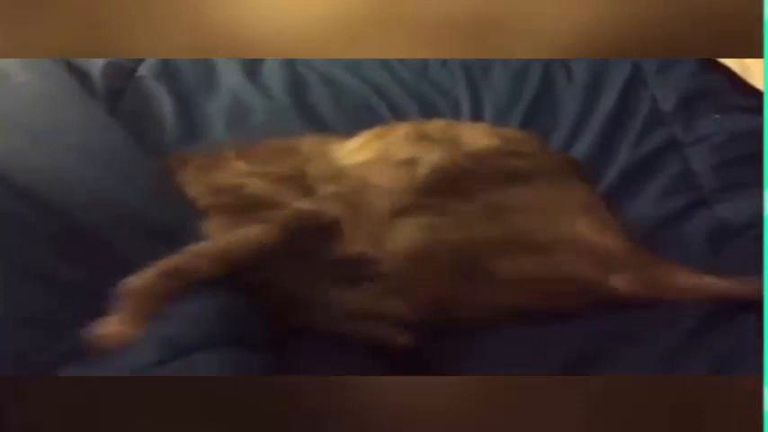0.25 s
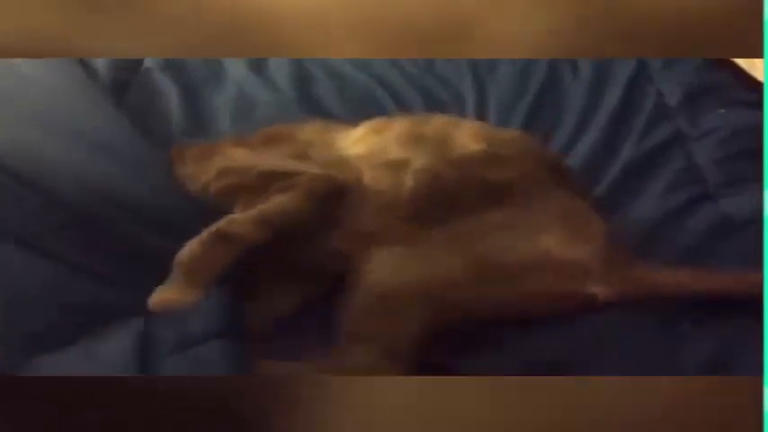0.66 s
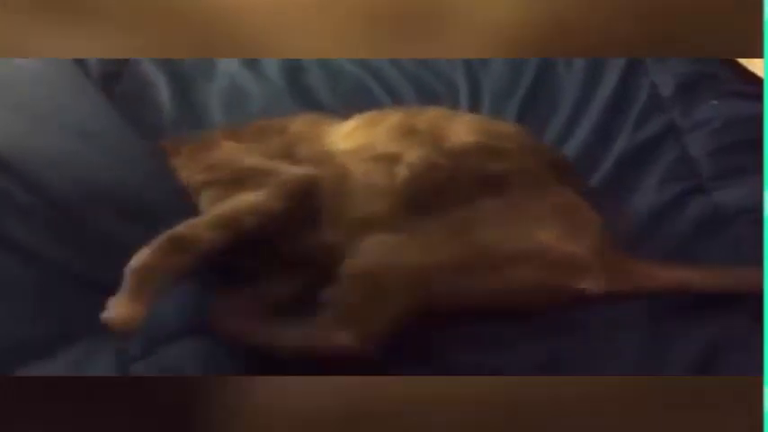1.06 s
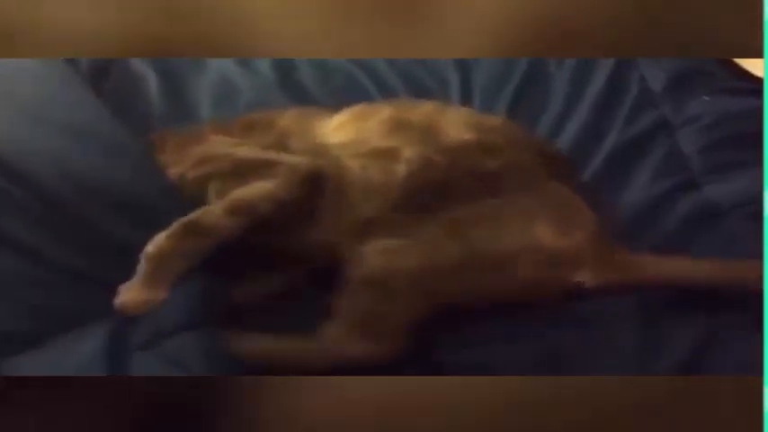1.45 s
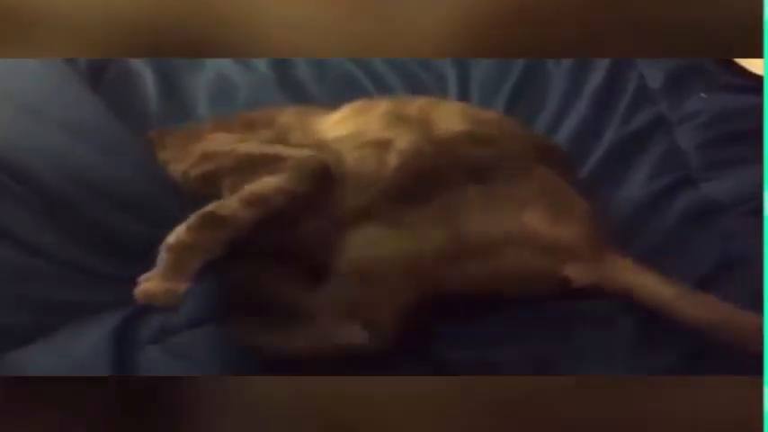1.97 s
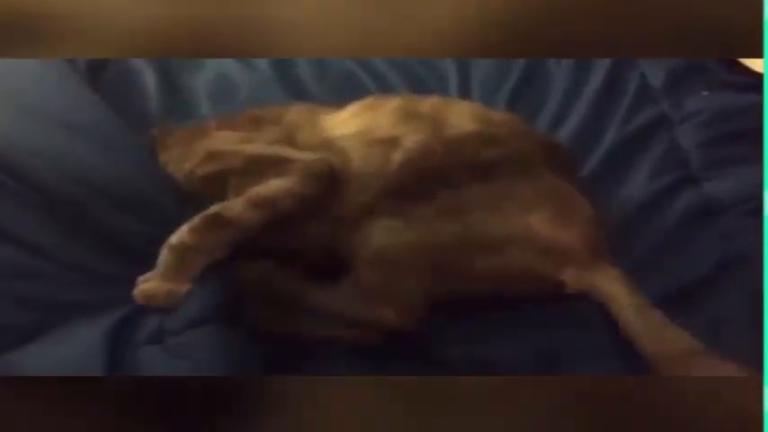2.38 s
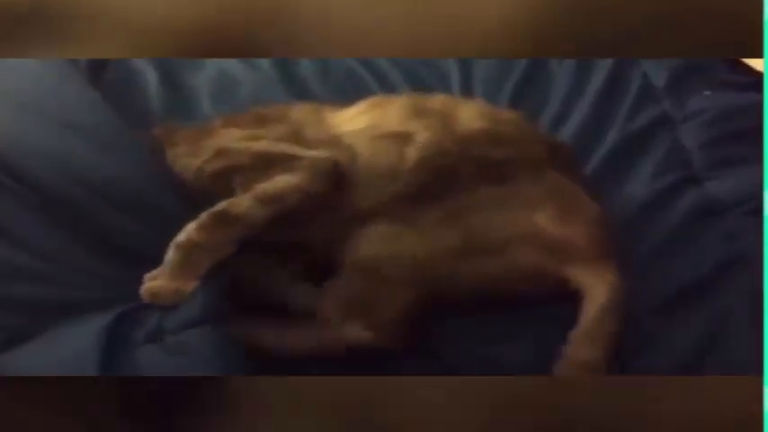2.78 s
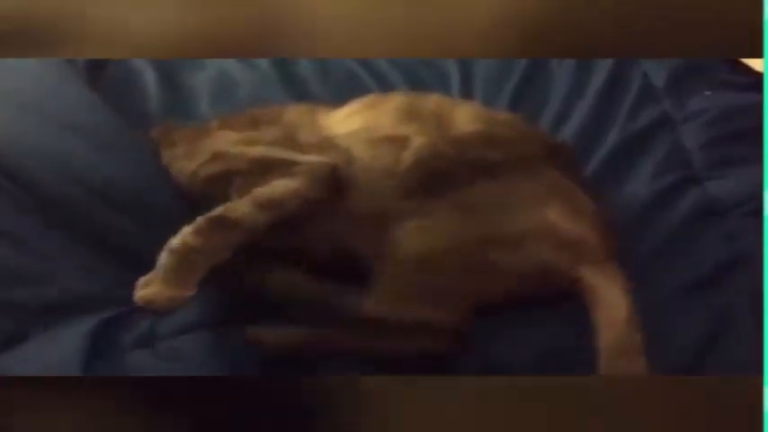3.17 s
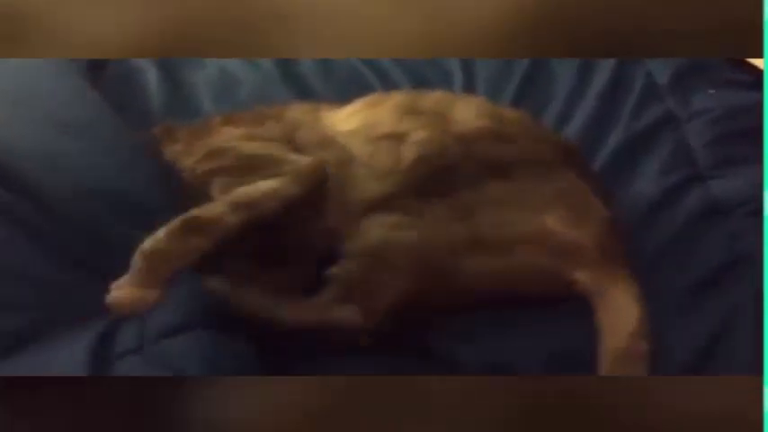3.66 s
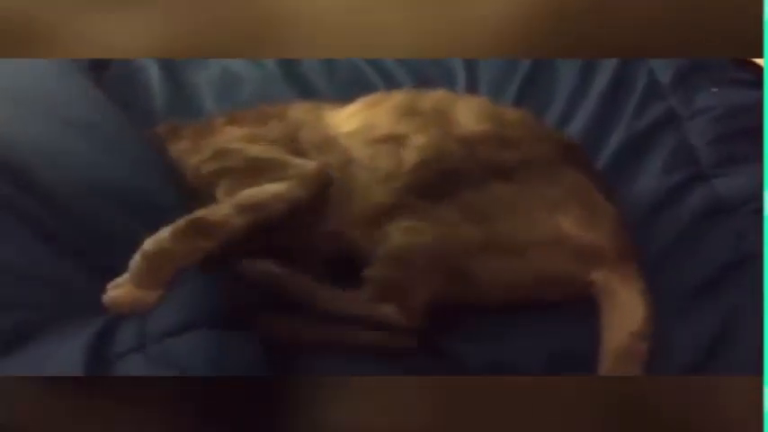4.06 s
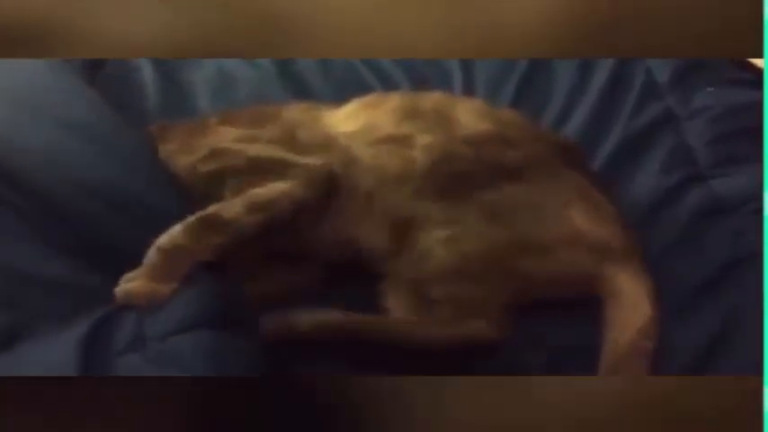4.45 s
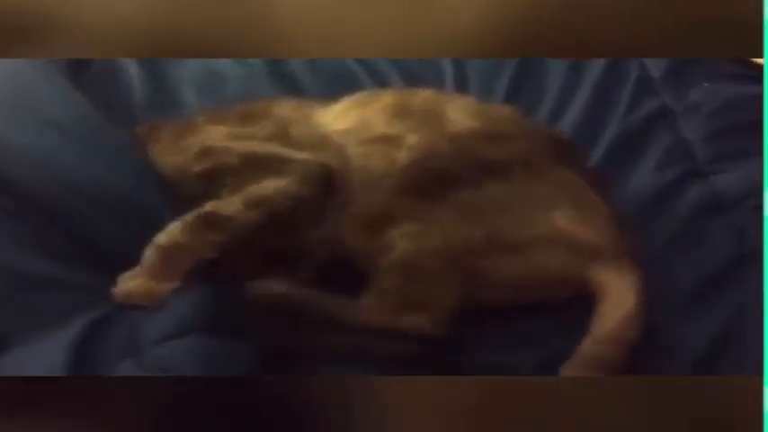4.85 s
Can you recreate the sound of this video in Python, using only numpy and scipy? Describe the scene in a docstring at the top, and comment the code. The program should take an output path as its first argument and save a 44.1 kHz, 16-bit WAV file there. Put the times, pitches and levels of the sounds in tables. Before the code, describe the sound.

Irregular scratching on cloth, dull rubs mixed with claw rasps and sharp little snags, crowding mid-way, then thinning over faint rustle.

```python
"""A cat on a bedspread kicks with a hind leg for five seconds in a quiet room; both channels are alike.
From the start, strokes rub dully, rasp and hiss: each is a run of tiny slips of the paw on the cloth.
Narrow-band scrapes slide over the weave, snagged threads tick, and the leg lands with soft thumps.
The strokes crowd together from about two seconds on, thin out and soften after three and a half,
then return briefly near the end. Rustling bedding and still air are there throughout."""
import sys
import numpy as np
from scipy import signal
from scipy.fft import rfft, irfft
from scipy.io import wavfile
from scipy.ndimage import uniform_filter1d

SR = 44100
rng = np.random.default_rng(int(sys.argv[2]) if len(sys.argv) > 2 else 0)


def wrap_up_sound(samples):
    """Save the sound to the file named by the first command line argument, as 16-bit audio."""
    columns = np.atleast_2d(samples).T
    # keep every value between -1 and 1, then stretch to whole-number steps
    tamed = np.clip(columns, -1, 1)
    steps = np.round(tamed * 32767).astype(np.int16)
    wavfile.write(sys.argv[1], SR, steps)


N = 225703  # length of the sound, in samples

# How the rubbing cloth spreads its sound over pitch: (frequency [Hz], relative level [dB])
CLOTH_COLOUR = [(30, -10), (70, -2.5), (130, 3), (260, 1), (420, 3), (560, 4), (680, 4), (760, -10),
                (860, -3), (1000, -0.5), (1300, -0.5), (1420, -8.5), (1700, -11), (2300, -17)]
# The same for rasping claws: (frequency [Hz], relative level [dB])
CLAW_COLOUR = [(1100, -49), (1650, -26), (1880, -3.5), (2300, 3.5), (2550, 2.5), (2850, 3), (3100, 1.5),
               (3320, 7.5), (3520, -5), (3720, 4), (3950, -10), (4300, -9.5), (5200, -53)]
# The same for hissing fur and fibres: (frequency [Hz], relative level [dB])
FIBRE_COLOUR = [(3300, -17), (4200, 5), (4700, 1.5), (5300, 5), (6300, 3), (7200, -2), (8800, -1.5),
                (10000, -8.5), (11000, -25.5), (14000, -50.5)]


def scratching(lumps_db=2.0):
    """The paw's grip wavers in all three kinds of friction; folds passing under it make the rub lumpy."""
    cloth, claw, fibre = stroke_levels()
    grip = drift(260)
    folds = from_db(lumps_db * drift(110))
    rub = friction(cloth * folds, 8.1 * grip, per_s=2200, spread_db=0.5, bite_db=-56.0)
    rasp = friction(claw, 3.0 * grip, per_s=3100, spread_db=0.0, bite_db=-54.5)
    hiss = friction(fibre, 4.9 * grip, per_s=8700, spread_db=-4.0, bite_db=-50.0)
    return colour(rub, CLOTH_COLOUR) + colour(rasp, CLAW_COLOUR) + colour(hiss, FIBRE_COLOUR)


def stroke_levels():
    """Cloth rubs as loudly as the push; claws and fibres grow faster, and louder with the claws out."""
    # Strokes of the paw: (touch-down [s], swell [s], fade [s], push [dB], claws out [dB])
    strokes = [(0.042, 0.085, 0.054, -49, -7.5), (0.063, 0.005, 0.082, -54.5, 4.5),
               (0.085, 0.013, 0.018, -54.5, 5), (0.234, 0.13, .07, -60.5, -1.5),
               (0.407, 0.049, 0.04, -52, -5), (0.527, 0.035, 0.034, -57.5, 0),
               (0.78, 0.057, 0.031, -49, -1), (0.899, 0.016, 0.04, -56.5, -7),
               (1.053, 0.032, 0.04, -62.5, 0.5), (1.106, 0.087, .05, -56.5, -2.5),
               (1.229, 0.0067, 0.048, -55, 0), (1.538, .077, .04, -52.5, -2.5),
               (1.854, 0.067, 0.019, -49.5, 1.5), (1.93, 0.052, 0.039, -51, -1.5),
               (2.081, 0.014, 0.028, -54, -3), (2.108, 0.073, 0.025, -51, 1), (2.188, 0.024, .027, -51, 3),
               (2.339, 0.016, 0.19, -55, -6.5), (2.404, 0.017, .034, -48.5, 3.5),
               (2.522, 0.042, 0.093, -55, -6.5), (2.661, 0.028, .04, -50.5, -12),
               (2.682, 0.015, 0.023, -50.5, 6), (2.728, 0.019, 0.038, -57.5, -1),
               (2.85, 0.024, 0.046, -51.5, -9), (2.917, 0.0097, 0.027, -47.5, -10),
               (2.932, 0.028, 0.029, -45.5, 1.5), (3.008, 0.034, 0.039, -56, 0),
               (3.112, .011, 0.02, -50.5, -11), (3.165, 0.015, 0.023, -55.5, -7),
               (3.229, 0.0014, 0.032, -55.5, 9.5), (3.244, 0.037, 0.032, -55, 4),
               (3.384, 0.12, 0.049, -58, -6), (3.598, .016, 0.011, -65.5, 2),
               (3.715, .088, 0.044, -58.5, -7), (3.884, 0.061, 0.055, -70, 3.5),
               (4.249, 0.073, 0.092, -64, 0.5), (4.419, 0.031, 0.022, -54, 1),
               (4.769, 0.027, 0.024, -55, -3), (4.799, .032, 0.049, -49, 3),
               (4.893, 0.011, 0.017, -51, -12)]
    usual_push_db = -50
    claw_db, claw_growth = -44, 1.557  # level at the usual push; dB per dB of push
    fibre_db, fibre_growth = -50.5, 1.343  # the same for the fibres, before the growth of claws out
    fibre_per_claw = 1.64  # dB per dB of claws out
    fibre_lag_s = 0.0028  # the fibres hiss loudest this much later, as the paw speeds up
    touch_s = 0.0026  # the sound rises from nothing this quickly as the paw meets the cloth
    t = np.arange(N) / SR
    power = np.zeros((3, N))
    for start_s, swell, fade, push_db, claws_db in strokes:
        near = (t > start_s) & (t < start_s + swell + 4 * fade)
        age = t[near] - start_s
        push = from_db(push_db - usual_push_db)
        press = pressing(age, swell, fade)
        late_press = pressing(age, swell + fibre_lag_s, fade)
        cloth = from_db(push_db) * press
        claw = from_db(claw_db + claws_db) * (push * press) ** claw_growth
        fibre = from_db(fibre_db + fibre_per_claw * claws_db) * (push * late_press) ** fibre_growth
        touch = np.minimum(age / touch_s, 1)
        power[:, near] += (touch * np.array([cloth, claw, fibre])) ** 2  # powers of strokes add
    return np.sqrt(power)


def pressing(age, swell, fade, shape=1.16, touch_db=-12.5, hold_s=0.0019):
    """The paw touches down below full push, leans in to it, holds it briefly and eases off."""
    leaning = from_db(touch_db * np.clip(1 - age / swell, 0, 1))
    easing_age = np.maximum(age - swell - hold_s, 0)
    return leaning * np.exp(-(easing_age / fade) ** shape)


def friction(level, grip_db, per_s, spread_db, bite_db):
    """A light touch brushes smoothly; pressed harder than bite_db, it mostly sticks and slips in grains."""
    bite = level / (level + from_db(bite_db))
    grains = evened(from_db(grip_db) * slips(per_s, spread_db))
    brushing = rng.standard_normal(N)
    return level * (np.sqrt(bite) * grains + np.sqrt(1 - bite) * brushing)


def slips(per_s, spread_db):
    """Tiny slips at random moments, each a click of random sign; rms 1."""
    sizes = from_db(spread_db * np.minimum(rng.exponential(1, N), 4))
    happens = rng.random(N) < per_s / SR
    signs = rng.choice([-1, 1], N)
    return rms_one(happens * sizes * signs)


def evened(x, span_s=0.012):
    """The paw's push bounds how much the slips can give within a few milliseconds."""
    nearby_power = np.abs(uniform_filter1d(x ** 2, max(int(span_s * SR), 1)))
    return x / np.sqrt(nearby_power + 1e-3)


def weave_scrapes(spread_db=-2.0):
    """Uneven thread crossings ring in a narrow band that glides up as the paw gathers speed."""
    # Narrow-band scrapes as the paw or claws slide over the ribs of the weave:
    # (time [s], half length [s], pitch [Hz], level [dB])
    scrape_table = [(0.099, .009, 3050, -48), (0.457, .012, 2830, -50), (0.848, .008, 6020, -51.5),
                    (1.617, 0.0092, 4000, -49.5), (1.915, .012, 2873, -39), (1.967, .007, 5390, -48.5),
                    (1.973, .007, 3040, -44.5), (2.103, .012, 1200, -54.5), (2.164, .022, 3040, -44.5),
                    (2.211, .010, 5330, -45.5), (2.215, 0.0062, 7720, -50), (2.43, .012, 3078, -38.5),
                    (2.693, .008, 3000, -38), (2.957, .008, 2883, -39), (3.051, 0.012, 2797, -51.5),
                    (3.254, 0.003, 5580, -42), (3.262, .004, 2860, -44), (3.281, .012, 5080, -44),
                    (3.547, .02, 648, -61.5), (4.832, .025, 2186, -48.5), (4.836, .026, 1186, -52.5)]
    width_hz, widest = 850, 0.19  # spread of the crossing rate; at most this share of the pitch
    glide = 0.0394  # rise per half length, as a share of the pitch
    t, out = np.arange(N) / SR, np.zeros(N)
    for middle_s, half, pitch_hz, level_db in scrape_table:
        near = np.abs(t - middle_s) < 3 * half
        place = (t[near] - middle_s) / half
        hz = pitch_hz * (1 + glide * np.clip(place, -1, 1))
        noise = rng.standard_normal(N) + 1j * rng.standard_normal(N)
        crossings = noise * from_db(spread_db * drift(400))
        narrow = signal.butter(2, min(width_hz, widest * pitch_hz) / 2, fs=SR, output="sos")
        wobble = signal.sosfilt(narrow, crossings[near])
        swell = 1 / np.sqrt(1 + place ** 6)
        # shift the slow wobble up to the gliding pitch
        scrape = swell * np.real(wobble * np.exp(2j * np.pi * np.cumsum(hz) / SR))
        out[near] += from_db(level_db) * scrape * np.linalg.norm(swell) / np.linalg.norm(scrape)
    return out


def snags(release=0.66):
    """A caught thread clicks, lets go the other way about a millisecond later, and frays briefly."""
    # A claw catches a thread: (time [s], tick [dB], tug on the cloth [dB])
    snag_table = [(0.070, -27, -28.5), (0.178, -25.5, -37), (0.9082, -25, -33), (1.084, -62, -28),
                  (1.7648, -70, -47), (1.992, -24, -22.5), (2.411, -21.5, -35), (2.416, -25, -32),
                  (2.666, -41, -31), (2.712, -34, -23.5), (3.177, -30.5, -32.5), (3.234, -15, -21.5),
                  (3.805, -67, -37.5), (4.353, -55, -37), (4.806, -28, -33), (4.8737, -21, -19.5)]
    hold_s, hold_scatter = 0.0007, 0.23  # typical time until release; its random spread, as a share
    fray_s, fray_db = 0.0033, -4.5  # fade time of the fraying; its energy against the catch
    fibre_db = -2.5  # snap of the fibres against the tick
    clicks = np.zeros((3, N))
    age = np.arange(SR // 40) / SR
    for catch_s, tick_db, tug_db in snag_table:
        fray = rng.standard_normal(len(age)) * np.exp(-age / fray_s)
        snap = from_db(fray_db) * fray / np.linalg.norm(fray)
        snap[0] += 1
        held_s = hold_s * np.exp(hold_scatter * rng.standard_normal())
        snap[round(held_s * SR)] -= release
        start = round(catch_s * SR)
        levels = from_db([tug_db, tick_db, tick_db + fibre_db])  # cloth, claw, fibre
        clicks[:, start:start + len(age)] += np.outer(levels, snap)
    colours = (CLOTH_COLOUR, CLAW_COLOUR, FIBRE_COLOUR)
    return sum(colour(click, points) for click, points in zip(clicks, colours))


def thumps(attack_s=0.00055, flap_s=0.0065):
    """The padded mattress gives a few low cycles while the cover flaps briefly."""
    # The leg lands: (time [s], level [dB], pitch [Hz], cycles until 60 dB down [count], cloth flap [dB])
    thump_table = [(0.122, -41, 195, 9.1, -44), (0.558, -49, 303, 12, -53), (0.5641, -33, 141, 3.1, -47),
                   (0.836, -39, 338, 9.4, -44), (1.606, -31.5, 480, 5.5, -57), (2.180, -44.5, 192, 18, -60),
                   (2.410, -28, 342, 4.3, -40.5), (2.713, -39.5, 156, 4.4, -47),
                   (3.297, -40, 360, 5.8, -45), (4.357, -44, 100, 13, -56), (4.748, -54, 62.5, 12, -57.5)]
    t, thud, flap = np.arange(N) / SR, np.zeros(N), np.zeros(N)
    for land_s, level_db, hz, cycles, flap_db in thump_table:
        age = np.clip(t - land_s, 0, 0.5)
        landing = 1 - np.exp(-age / attack_s)
        dying = np.exp(-np.log(1000) * age * hz / cycles)
        thud += from_db(level_db) * landing * dying * np.cos(2 * np.pi * hz * age)
        flap += from_db(flap_db) * landing * np.exp(-age / flap_s)
    return thud + colour(flap * rng.standard_normal(N), CLOTH_COLOUR)


def stirring(fibre_db=-7, claw_db=-11):
    """The bedding rustles faintly under the body: small slips of cloth, with finer, brighter ones."""
    # How loudly the bedding stirs: (time [s], level [dB])
    stir = [(0, -77), (.25, -65), (.7, -74.5), (1.05, -65.5), (1.45, -83), (1.802, -70.5), (2.502, -72),
            (2.818, -75.5), (3.4, -66.5), (3.68, -72.5), (4.15, -81), (4.551, -74.5), (4.622, -78),
            (4.95, -70.5), (5.12, -70.5)]
    stir_db = np.interp(np.arange(N) / SR, *np.transpose(stir))
    level = from_db(stir_db + 2.0 * drift(30.5))
    lumps = from_db(0.77 * drift(90))
    rub = colour(level * lumps * slips(per_s=1600, spread_db=4.5), CLOTH_COLOUR)
    fine = level * slips(per_s=13000, spread_db=9.5)
    bright = from_db(claw_db) * colour(fine, CLAW_COLOUR)
    return rub + bright + from_db(fibre_db) * colour(fine, FIBRE_COLOUR)


def bedroom(x, t60=0.36, wet_db=-22, gap_s=0.0012):
    """A softly furnished room adds a short, weak tail that falls 60 dB in t60 seconds."""
    t = np.arange(SR // 2) / SR
    tail = rng.standard_normal(len(t)) * np.exp(-np.log(1000) * t / t60) * (t > gap_s)
    return x + from_db(wet_db) * signal.fftconvolve(x, tail / np.linalg.norm(tail))[:N]


def still_air(level_db=-73):
    """The still air of the room is steady coloured noise."""
    # Colour of the air: (frequency [Hz], relative level [dB])
    air_colour = [(20, -12), (50, 4.5), (110, 2.5), (200, -2), (400, -6.5), (650, -29), (780, -15.5),
                  (1250, -33.5), (1500, -21.5), (3200, -15), (4500, -20.5), (10500, -15.5), (14000, -55.5)]
    return from_db(level_db) * colour(rng.standard_normal(N), air_colour)


def from_db(db):
    """Turn decibels into a gain."""
    return 10 ** (np.asarray(db) / 20)


def rms_one(x):
    """Scale to an rms (average strength) of 1."""
    return x / np.sqrt(np.mean(x ** 2) + 1e-20)


def drift(rate):
    """Random wandering of rms 1: straight lines between new random values, rate times a second."""
    knots = rng.standard_normal(N)
    return rms_one(np.interp(np.arange(N) / SR * rate, np.arange(N), knots))


def gains(points, size):
    """Read a colour table as gains on an FFT grid, along a logarithmic frequency scale."""
    hz, db = np.transpose(points)
    grid_hz = np.arange(size // 2 + 1) * SR / size
    return from_db(np.interp(np.log(grid_hz + 1), np.log(hz), db))


def colour(x, points, size=4096):
    """Filter with the given colour at unit energy, responding as early as it can (minimum phase)."""
    cepstrum = irfft(np.log(gains(points, size)))
    # folding the second half onto the first removes any response before the sound
    cepstrum[1:size // 2] *= 2
    cepstrum[size // 2 + 1:] = 0
    response = irfft(np.exp(rfft(cepstrum)))
    return signal.fftconvolve(x, response / np.linalg.norm(response))[:N]


def scene():
    """Cat and still air reach both ears alike."""
    cat = bedroom(scratching() + weave_scrapes() + snags() + thumps() + stirring())
    both = cat + still_air()
    return np.array([both, both])


def record(dry, cutoff_hz=10950):
    """A steep low-pass filter cuts the top."""
    low_pass = signal.ellip(12, 0.1, 70, cutoff_hz, fs=SR, output="sos")
    return signal.sosfilt(low_pass, dry)


dry = scene()
out = record(dry)
wrap_up_sound(out)
```